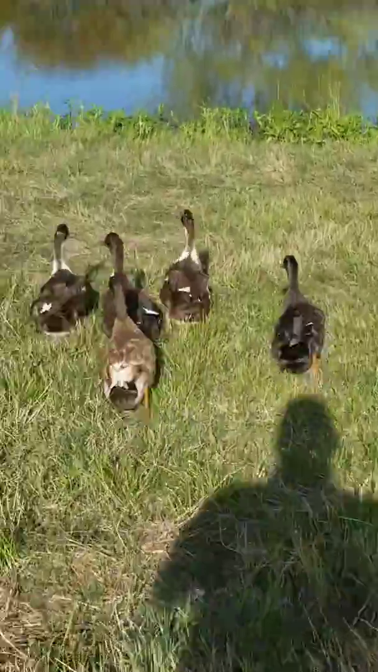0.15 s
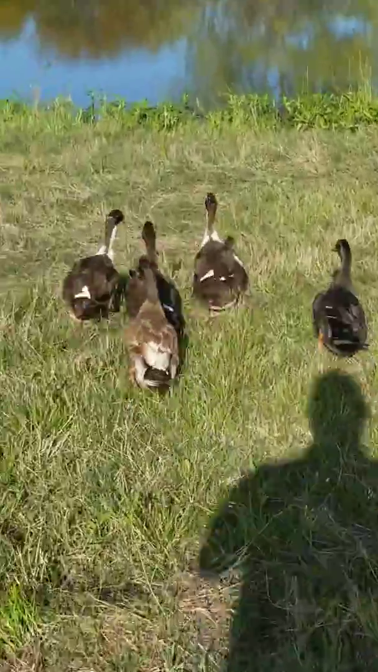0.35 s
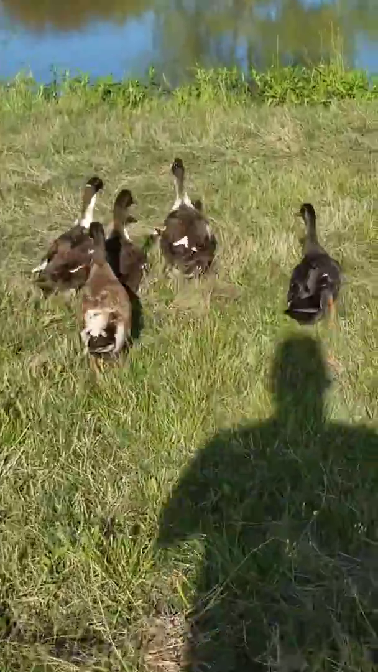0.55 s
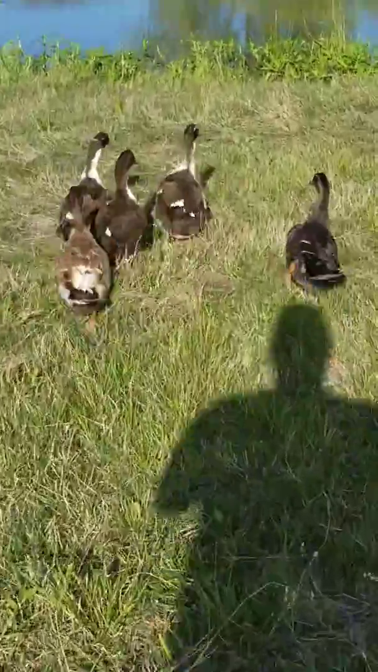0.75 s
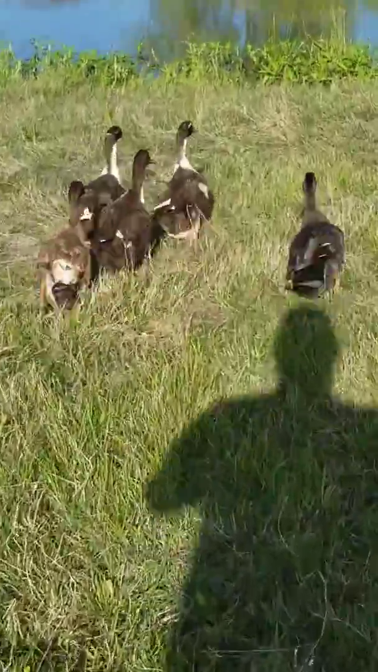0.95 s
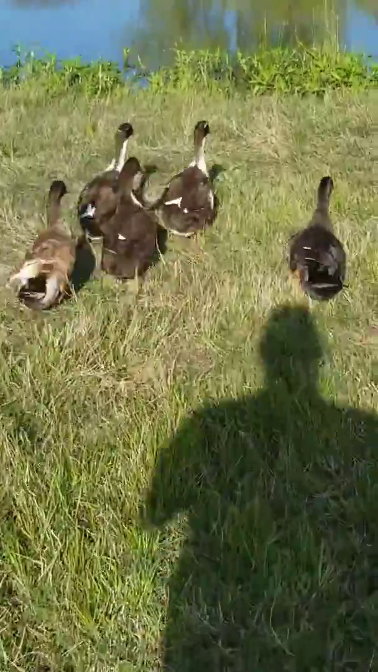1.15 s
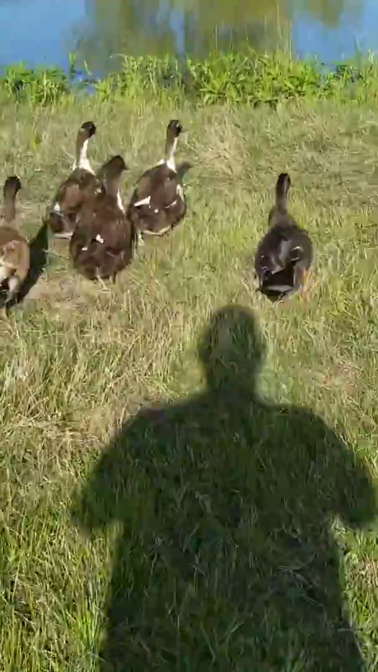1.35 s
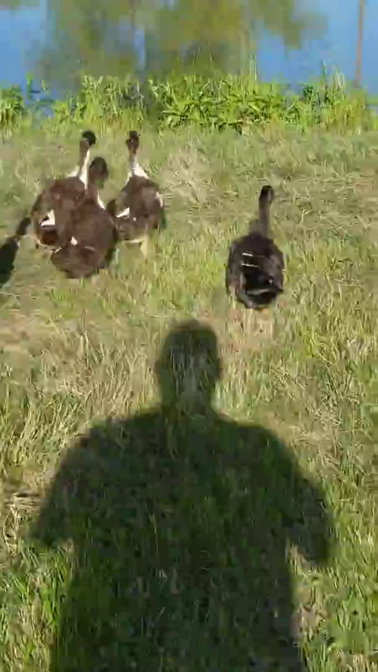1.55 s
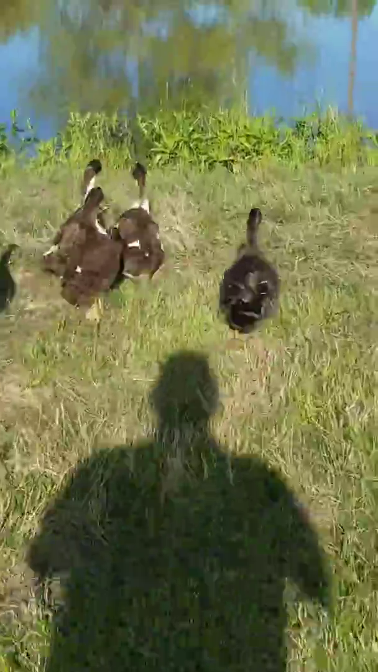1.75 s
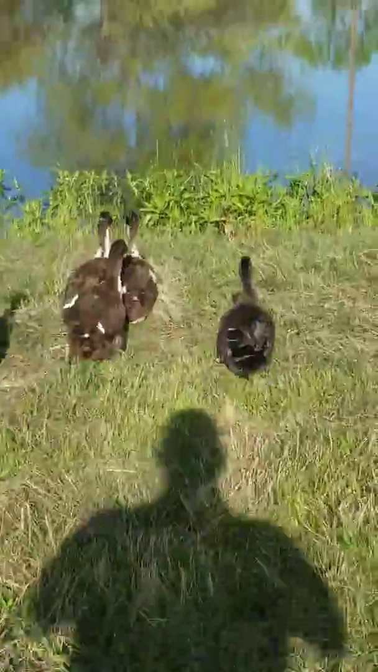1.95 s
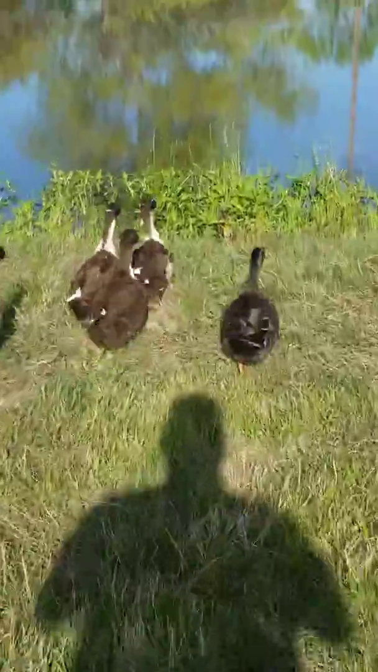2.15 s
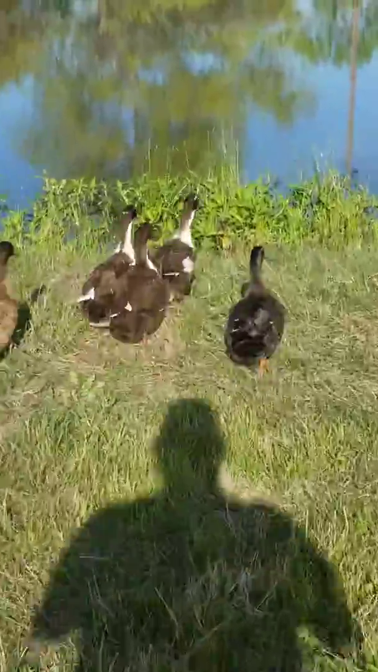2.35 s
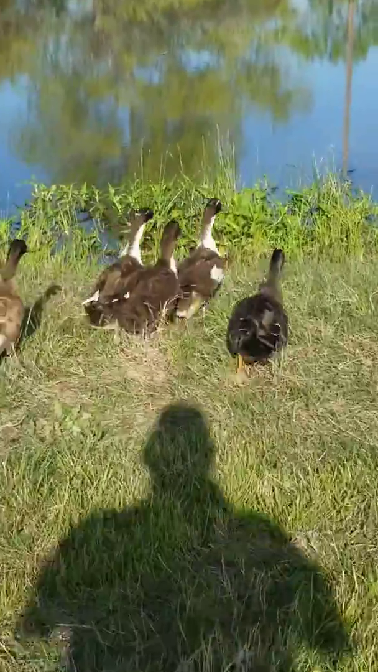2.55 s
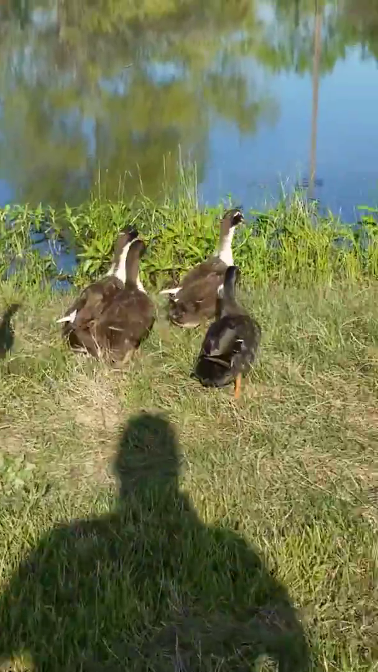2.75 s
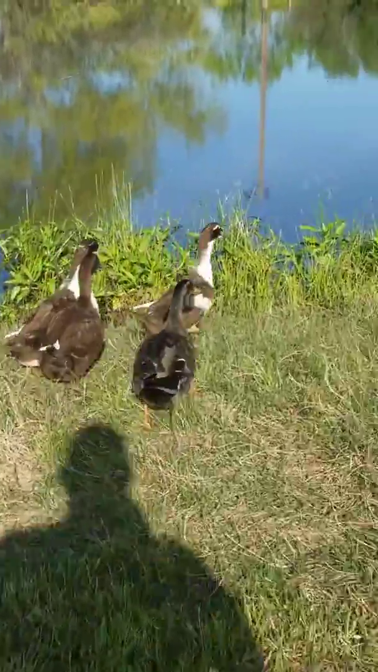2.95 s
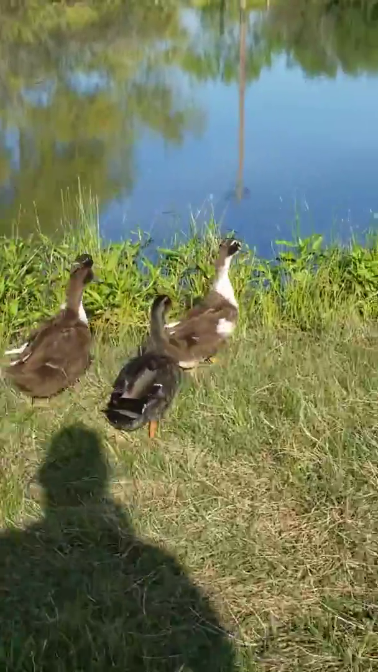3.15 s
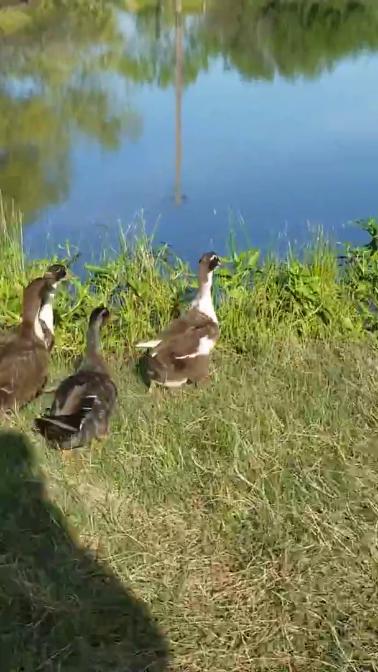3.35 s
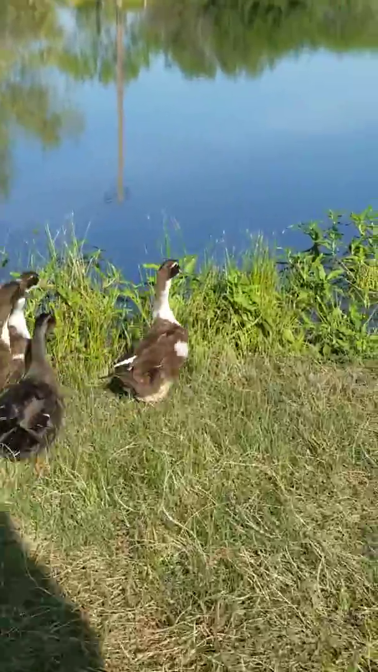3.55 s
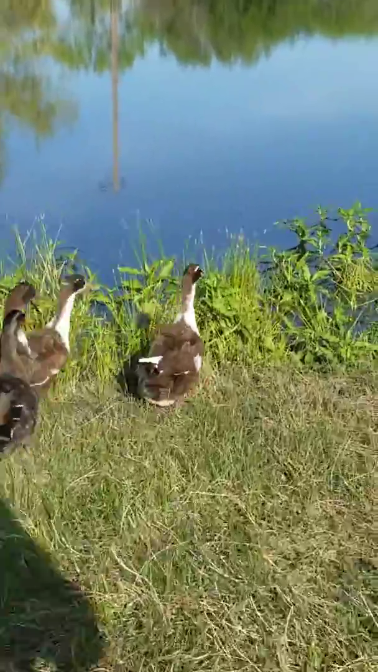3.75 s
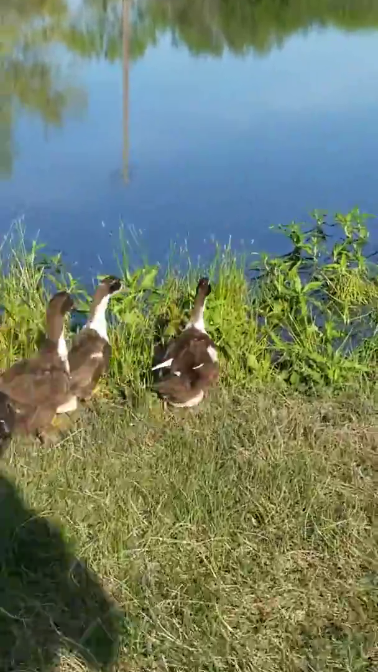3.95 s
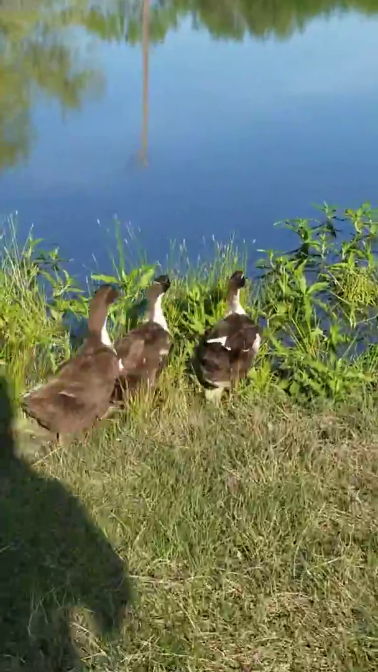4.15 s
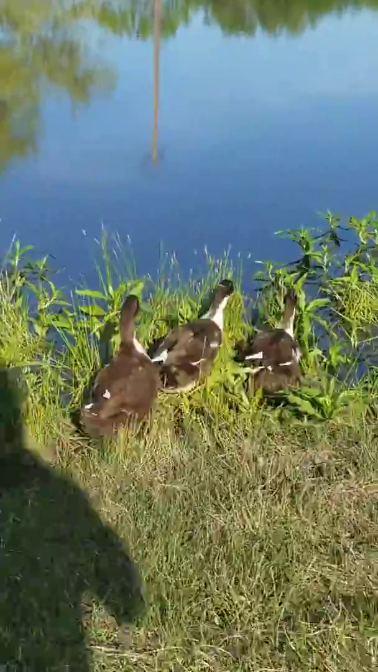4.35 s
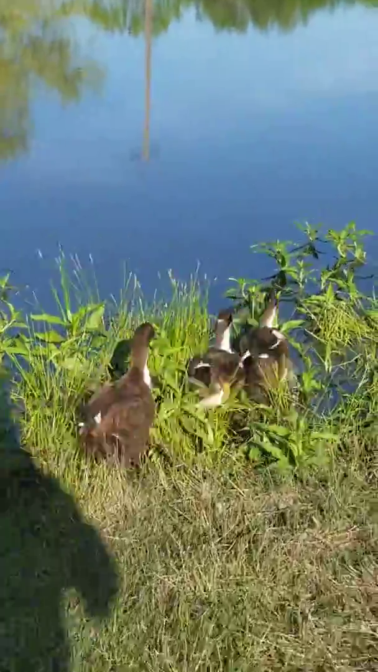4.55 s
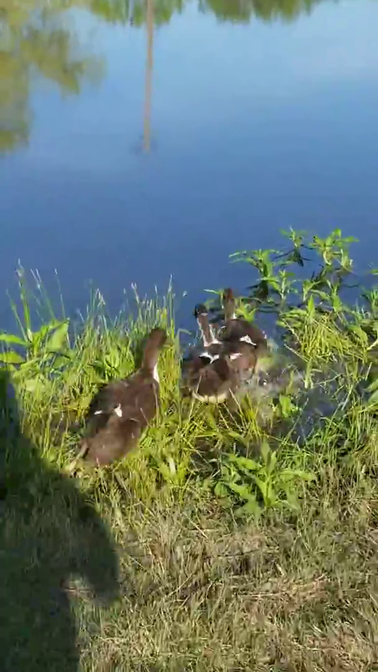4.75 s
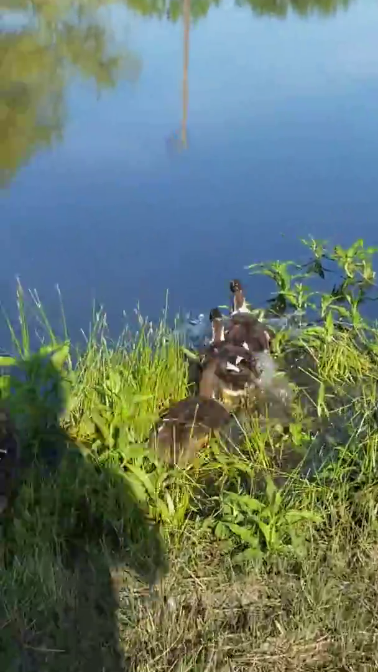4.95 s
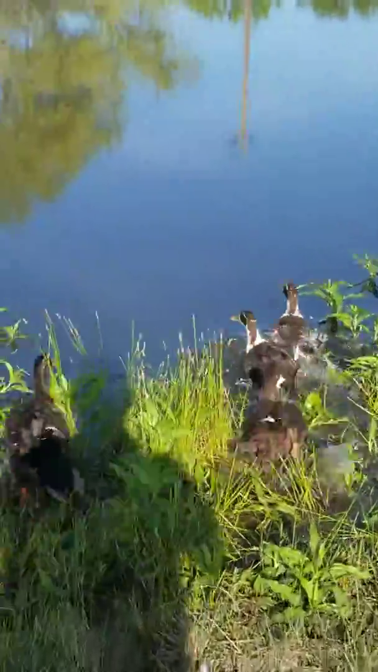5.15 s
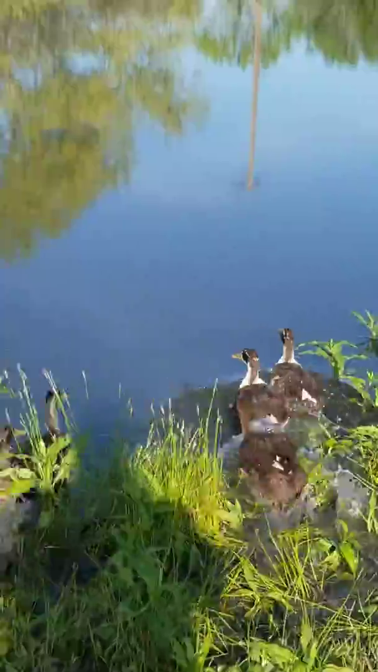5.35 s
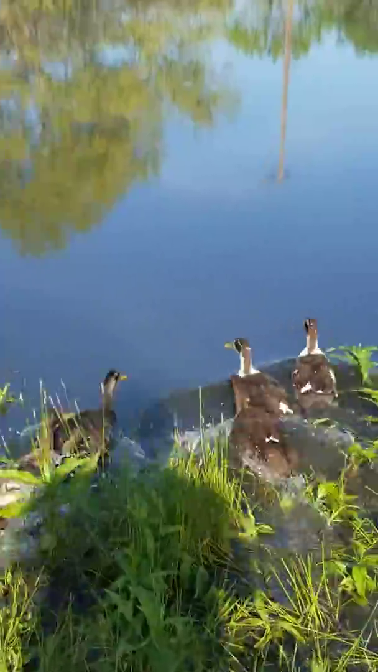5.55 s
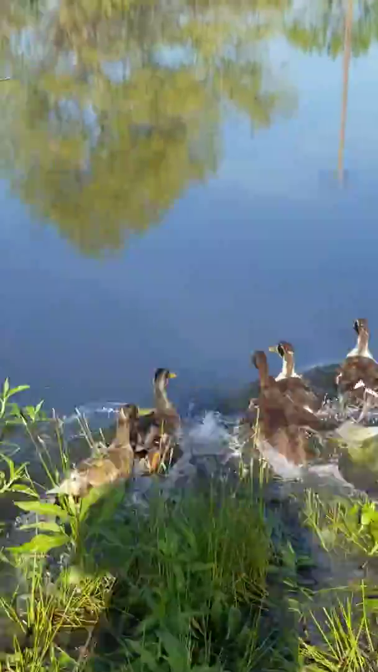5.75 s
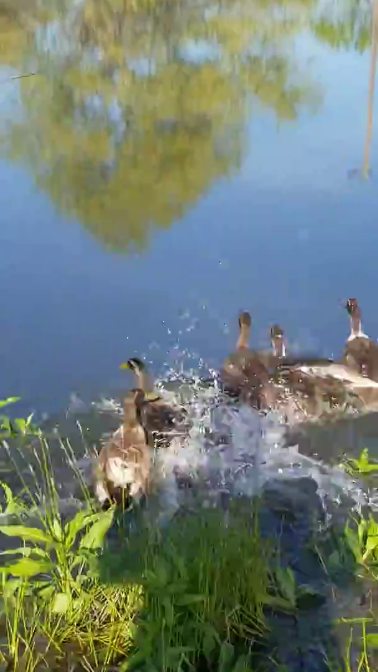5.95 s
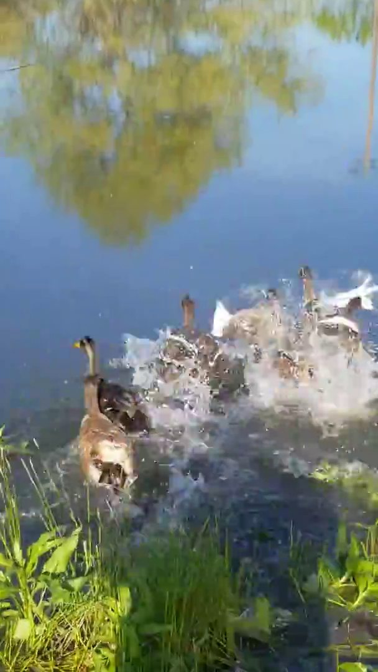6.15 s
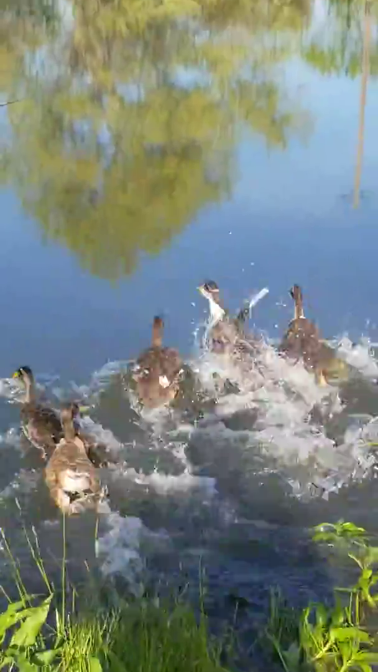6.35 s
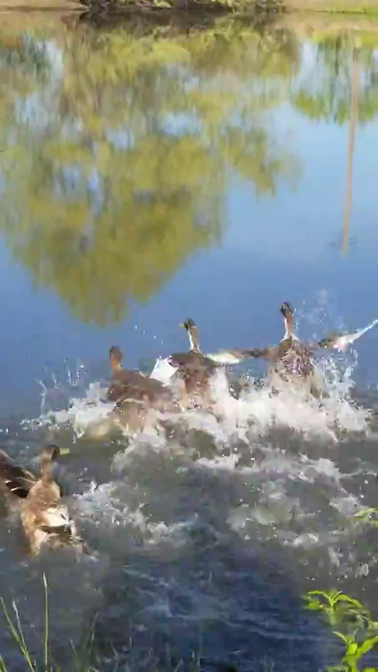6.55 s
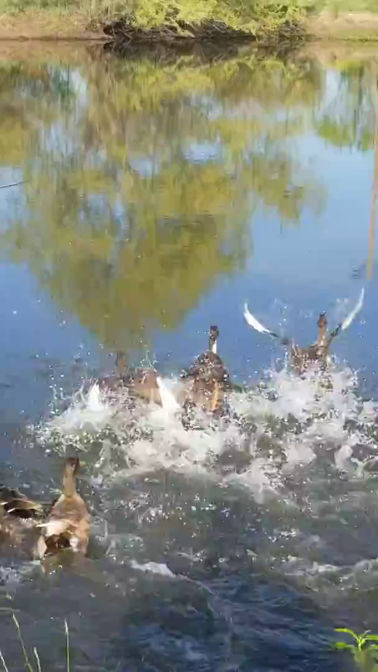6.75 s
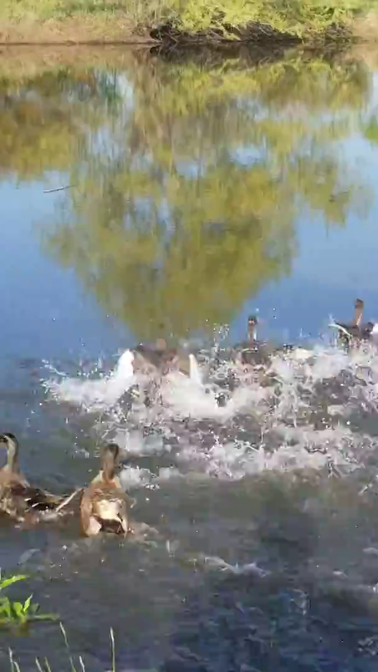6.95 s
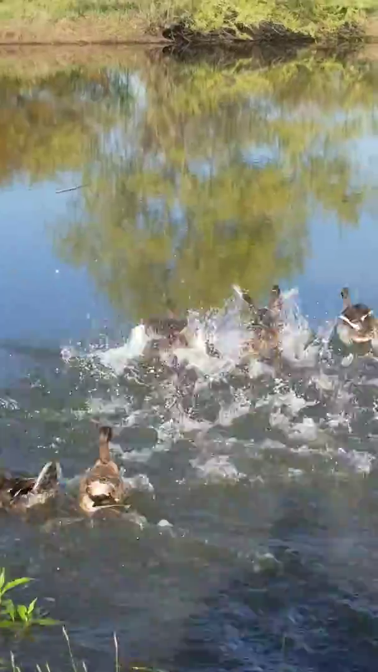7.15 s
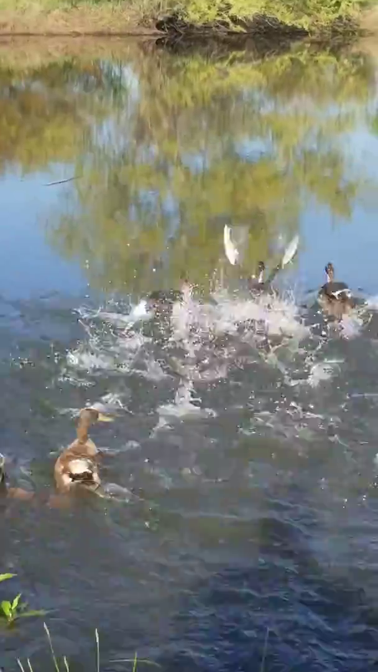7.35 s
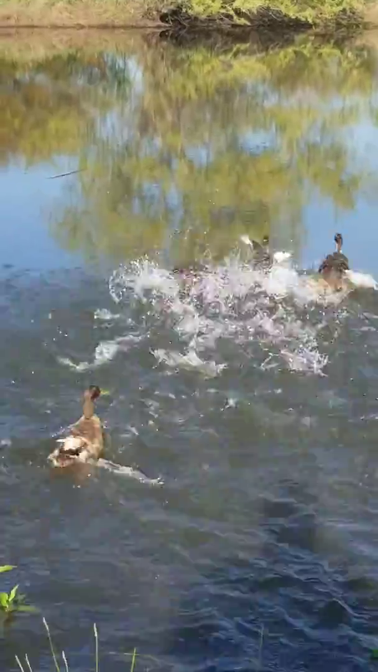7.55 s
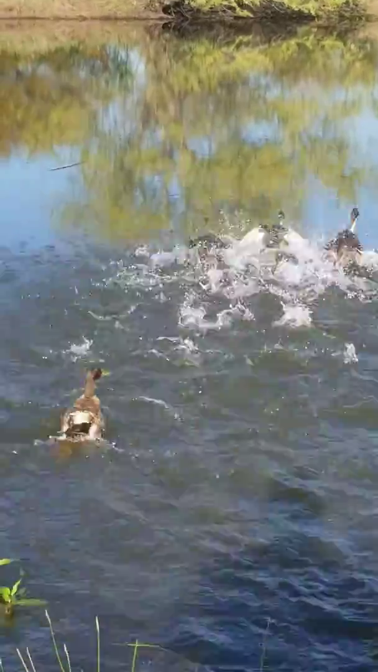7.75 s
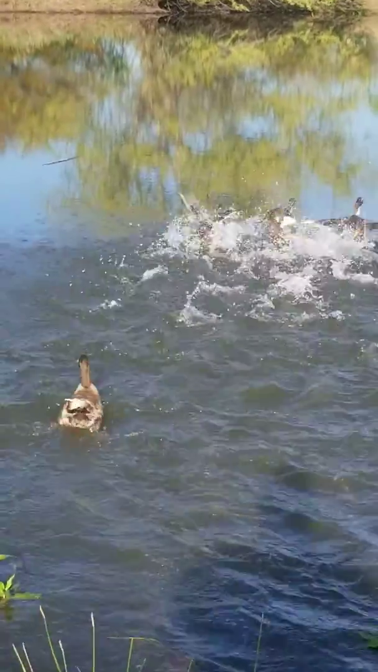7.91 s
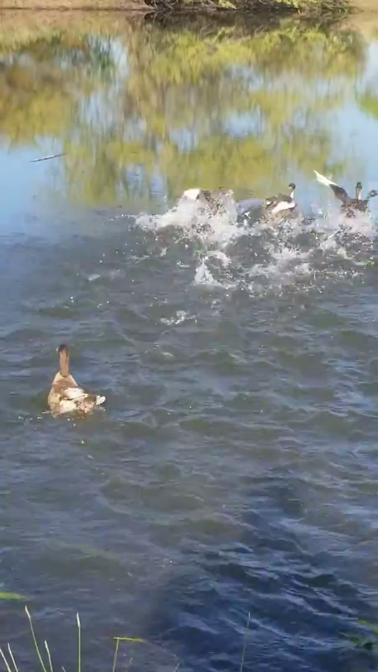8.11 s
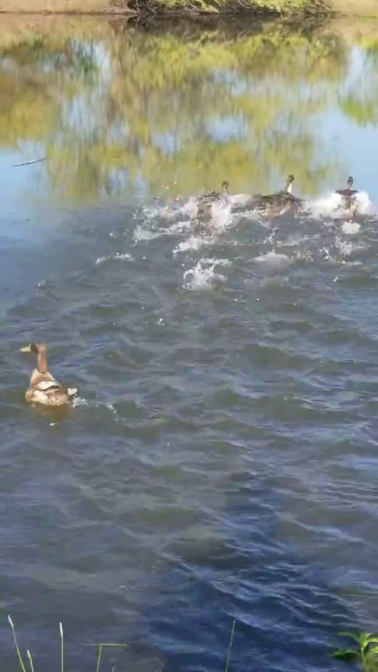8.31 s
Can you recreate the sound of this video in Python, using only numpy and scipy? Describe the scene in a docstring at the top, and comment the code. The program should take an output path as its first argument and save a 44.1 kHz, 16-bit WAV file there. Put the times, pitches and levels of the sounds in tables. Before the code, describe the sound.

Close swishing footsteps and short duck calls on a grassy bank give way to loud, frantic splashing as the ducks rush into the water.

```python
"""Ducks herded into a pond

A walker herds ducks through dry grass: shoes swish and crunch right below the two microphones, made of
random clicks, while stalks knock and blades crack. Drakes rasp and ducks quack ahead, as pulses ringing
throat and bill. Then the flock runs into the water with wing slaps, spray and ringing bubbles.
Low puffs of noise rumble: wind or handling at first, later low thumps along with the slaps."""
import sys
import numpy as np
from scipy import signal
from scipy.fft import rfft, irfft, next_fast_len
from scipy.io import wavfile

SR = 44100
rng = np.random.default_rng(int(sys.argv[2]) if len(sys.argv) > 2 else 0)


def unload_audio(sound):
    """Save the sound as a 16-bit wav file, at the path given as the first command line argument."""
    columns = np.transpose(np.atleast_2d(sound))
    # keep every value between -1 and 1, then stretch to whole-number steps
    steps = np.round(np.clip(columns, -1, 1) * 32767)
    wavfile.write(sys.argv[1], SR, steps.astype(np.int16))


N = 369548   # samples in the scene
SIZE = next_fast_len(N + 4096)   # transform length, with room for filter tails
HZ = np.maximum(np.arange(SIZE // 2 + 1) * SR / SIZE, 1)   # frequency of every bin

# All levels are relative: the mixes below add their own trims.
# Quiet open air, spectrum: (f/Hz, level/dB)
AIR = [(59, -38), (100, -39), (372, 18), (1240, -45.5), (1640, 4), (2560, -28), (2840, -40), (3090, -24),
       (3660, -12), (15800, -4.5)]
AIR_DB = -56

# Low puffs of rumble, wind or handling at first, later low thumps along with the slaps:
# (middle t/s, length/s, level/dB)
PUFFS = [(0.02, 0.021, -52), (0.34, 0.025, -54), (0.73, .02, -62), (0.9, .04, -69), (1.03, .02, -73),
         (1.28, 0.03, -73), (1.51, .02, -60), (1.75, .02, -75), (2.12, 0.094, -67), (2.54, 0.026, -59),
         (2.85, 0.43, -56.5), (3.28, 0.089, -60), (3.82, 0.31, -66), (4.06, 0.025, -59), (4.25, .04, -58.5),
         (4.5, .04, -74), (5.34, .02, -72), (5.74, .02, -60), (5.98, 0.049, -60), (6.21, .04, -63),
         (6.36, .02, -58), (6.6, 0.26, -60), (6.85, 0.056, -65), (7.09, 0.024, -65), (7.28, 0.054, -69),
         (7.48, 0.082, -60.5), (7.72, 0.046, -61), (7.97, 0.018, -66), (8.07, .04, -66), (8.37, .02, -65)]
PUFF_RISE_DB_PER_S, PUFF_FALL_DB_PER_S, PUFF_REST_DB = 236, 211, -82

# A shoe sweeps through the blades: (middle t/s, length/s, level/dB)
SWEEPS = [(0.02, 0.012, -53), (0.18, 0.027, -62), (0.33, 0.048, -43), (0.49, 0.016, -52),
          (0.63, 0.024, -65), (0.85, 0.18, -53.5), (1.22, 0.059, -55), (1.36, 0.043, -56),
          (1.65, 0.09, -52.5), (1.88, 0.06, -56.5), (2.26, 0.13, -52), (2.39, 0.043, -53),
          (2.82, 0.029, -53), (2.96, 0.027, -56), (3.11, 0.029, -61), (3.26, 0.033, -48),
          (3.38, 0.039, -50.5), (3.75, 0.27, -50), (3.97, .03, -60.5), (4.16, 0.13, -45.5),
          (4.36, 0.05, -50), (4.44, 0.046, -51), (4.64, 0.13, -46.5), (4.79, 0.037, -47),
          (4.835, 0.012, -42.5), (4.92, 0.026, -53), (5.0, 0.047, -55), (5.14, 0.17, -46),
          (5.36, 0.12, -53.5), (5.58, 0.022, -56), (5.76, 0.18, -52.5)]
SWEEP_RISE_DB_PER_S, SWEEP_FALL_DB_PER_S = 258, 193
# A sole presses the grass down: (middle t/s, length/s, level/dB)
TREADS = [(0.02, 0.012, -43), (0.335, 0.026, -38.5), (0.49, 0.015, -44.5), (0.61, .02, -58.5),
          (0.89, 0.15, -45), (1.365, 0.027, -43), (1.6, 0.018, -78), (1.72, 0.024, -60),
          (1.87, 0.0092, -54.5), (2.17, 0.12, -44), (2.41, 0.078, -43), (2.82, 0.0078, -37.5),
          (2.94, 0.049, -44), (3.32, 0.03, -46), (3.41, .01, -51), (3.67, 0.026, -48),
          (3.775, 0.043, -42.5), (3.84, .01, -52), (3.94, .02, -47), (4.04, 0.018, -48.5),
          (4.2, 0.011, -42.5), (4.235, 0.0092, -41.5), (4.5, 0.022, -43.5), (4.6, 0.019, -50),
          (4.665, 0.0093, -37.5), (4.75, 0.027, -42), (4.802, 0.011, -45), (4.905, 0.0091, -40),
          (4.945, .01, -58), (5.08, 0.0076, -39.5), (5.16, 0.037, -40.5), (5.36, .02, -42),
          (5.58, 0.0088, -42.5), (5.66, .01, -43), (5.73, 0.0073, -36)]
TREAD_RISE_DB_PER_S, TREAD_FALL_DB_PER_S = 346, 245
# Blades settle between steps: (t/s, swish level/dB, crunch level/dB)
GRASS_REST = [(0, -57.5, -53.5), (3, -60, -57.5), (5.8, -108, -64), (6.0, -66, -45)]
# Spectrum of brushed blades: (f/Hz, level/dB)
SWISH = [(300, -43), (1000, 16.5), (2500, 3), (3100, -1), (4000, 11), (4900, 3.5), (6500, 3.5),
         (8600, -3.5), (11000, 3), (15000, 8.5)]
# Spectrum of pressed grass: (f/Hz, level/dB)
CRUNCH = [(120, -30.5), (250, -8.5), (500, 11.5), (1000, -1), (2000, -1), (4000, -11), (9000, -41)]
# Short pitched knocks: under a shoe, a stalk; ahead, a duck's foot, bill or call pulse:
# (t/s, peak level/dB, pitch f/Hz, 1 ahead or 0 under a shoe)
KNOCKS = [(0.03, -32, 1200, 0), (0.284, -30, 1490, 0), (0.323, -21, 1500, 0), (0.381, -30, 1700, 0),
          (0.454, -21.5, 1290, 0), (0.7822, -32, 1230.0, 0), (0.864, -32, 670, 0), (0.88, -24, 643, 0),
          (0.9287, -14.5, 1320, 0), (0.9436, -18, 980.0, 0), (0.9675, -27, 1130.0, 0),
          (1.18, -37, 1600.0, 0), (1.344, -32, 1530.0, 0), (1.368, -26, 1090.0, 0), (1.3826, -28, 900, 0),
          (1.397, -29, 1300, 0), (1.586, -41, 1550.0, 1), (1.6016, -29, 1590.0, 0),
          (1.6335, -31, 1750.0, 0), (1.685, -27, 1260.0, 0), (1.701, -21.5, 1620, 0),
          (1.924, -34, 1030.0, 1), (1.936, -32, 950, 1), (2.095, -33, 1500, 1), (2.1895, -28, 1650.0, 1),
          (2.2208, -23.5, 1230.0, 0), (2.274, -29, 1530.0, 0), (2.695, -35, 1400.0, 1),
          (2.7373, -41, 1480.0, 1), (2.798, -36, 610.0, 0), (2.8233, -19.5, 710.0, 0),
          (2.8947, -27, 590.0, 0), (2.9504, -24, 1760, 1), (3.107, -40, 1380.0, 1), (3.197, -46, 1600.0, 1),
          (3.3247, -25.5, 620.0, 0), (3.634, -39, 1580.0, 1), (3.8364, -19.5, 1050, 0),
          (3.8916, -36, 2120.0, 1), (3.9017, -37, 1420.0, 1), (4.1123, -29, 1290, 1),
          (4.1915, -29, 1970, 1), (4.1994, -26, 1940, 1), (4.2834, -25, 1700, 1), (4.4743, -15.5, 1960, 1),
          (4.6121, -25, 1690.0, 1), (4.66, -21, 1240, 1), (4.7627, -43, 1300.0, 1),
          (4.9705, -35, 1660.0, 1), (5.016, -25.5, 2070.0, 1), (5.069, -16, 1430, 1),
          (5.0933, -28, 1840.0, 1), (5.1465, -25, 1400.0, 1), (5.2023, -34, 540.0, 0),
          (5.296, -35, 1700.0, 1), (5.3326, -26, 1710.0, 1)]
# Thin blades crack: (t/s, peak level/dB, pitch f/Hz)
CRACKS = [(0.0273, -32, 4230), (0.17, -46, 3910), (0.2409, -32.5, 5410), (0.2505, -27, 3660),
          (0.4184, -36, 14300), (0.4409, -28, 14900), (0.4858, -32, 13300), (0.625, -39, 13500),
          (0.9267, -25, 3570), (1.1393, -34, 3880), (1.3648, -32, 4080), (1.4163, -32, 4050),
          (1.5224, -48, 4070), (1.5713, -50, 3590), (1.593, -34, 3590), (1.632, -29, 3520),
          (1.8452, -46, 13800), (2.2195, -25, 3660), (2.3905, -40, 3690), (2.6653, -44, 13200),
          (2.6733, -41, 14900), (2.6963, -55, 3890), (2.7396, -32, 3520), (2.8998, -41, 3760),
          (3.0435, -51, 3540), (3.2151, -37, 13300), (3.5483, -47, 14800), (3.5758, -36, 3820),
          (3.9187, -34.5, 3920), (4.0038, -41, 13500), (4.188, -32, 11800), (4.337, -23.5, 4240),
          (4.3856, -29, 7420), (4.411, -31, 4120), (4.4722, -46, 4690), (4.5346, -32, 3950),
          (4.5805, -41, 13600), (4.5994, -43, 5260), (4.6586, -22, 4210), (4.798, -29, 14400),
          (4.8357, -27, 14200), (4.8344, -19, 13400), (4.9122, -34, 5140), (4.9901, -29, 4300),
          (5.0514, -44, 4110), (5.0679, -24.5, 4100), (5.1442, -26, 13700), (5.3353, -30, 4040),
          (5.5263, -36, 4170), (5.6002, -40, 4470)]

# Webbed feet shuffle in the grass: (middle t/s, length/s, level/dB)
PATTER = [(.03, 0.063, -56), (.2, 0.067, -53), (.33, 0.075, -49), (.47, 0.081, -55), (.61, 0.13, -55),
          (.78, 0.11, -54), (.9, 0.1, -52), (1.12, 0.065, -55.5), (1.185, .02, -53), (1.28, 0.061, -46.5),
          (1.35, 0.025, -49), (1.44, 0.051, -48), (1.6, 0.039, -46), (1.65, 0.035, -56),
          (1.74, 0.059, -49.5), (1.82, 0.017, -65), (1.9, 0.098, -50), (2.06, 0.016, -63),
          (2.14, 0.13, -46.5), (2.241, .006, -42), (2.258, .008, -43.5), (2.278, .012, -40.5),
          (2.37, 0.08, -48.5), (2.45, 0.022, -49), (2.71, 0.026, -49), (2.8, 0.052, -47.5),
          (2.93, 0.079, -46.5), (3.12, 0.094, -48.5), (3.205, 0.025, -46.5), (3.28, 0.037, -45.5),
          (3.385, 0.011, -47.5), (3.415, 0.017, -46.5), (3.61, .01, -53.5), (3.632, .02, -46),
          (3.68, 0.062, -47), (3.72, .015, -47), (3.77, 0.058, -50), (3.94, 0.093, -52.5),
          (4.05, 0.049, -49.5), (4.13, 0.038, -52), (4.22, 0.045, -60), (4.4, .15, -44.5),
          (4.58, 0.098, -52), (4.72, 0.022, -49), (4.8, 0.045, -51), (4.96, 0.11, -49), (5.12, 0.088, -48),
          (5.22, 0.037, -42.5), (5.32, .1, -46)]
PATTER_RISE_DB_PER_S, PATTER_FALL_DB_PER_S, PATTER_REST_DB = 900, 600, -66
# Spectrum of the flock's rustle: (f/Hz, level/dB)
FEET = [(250, -21), (500, 1.5), (900, -24.5), (1400, 5.5), (1620, 7), (1850, -6), (2300, 1.5), (3200, -1.5),
        (6000, -53.5)]
# a narrow band, likely a microphone resonance, colours that rustle
BAND_HZ, BAND_WIDTH_HZ, BAND_DB = 1590, 240, 0
# Short calls: (t/s, length/s, level/dB, pulse rate f/Hz, throat f/Hz, roughness, held to 0-1)
CALLS_MADE = [(0.698, 0.099, -46.5, 90, 2260, 0.7), (0.923, 0.024, -46, 84.7, 2090, 0.1),
              (1.102, 0.042, -52, 95, 2000, 0.46), (1.225, 0.052, -42.5, 92, 2270, 0.2),
              (1.253, 0.06, -42.5, 87.6, 1960, 0.15), (1.465, 0.06, -40.5, 91.1, 1930, 0.2),
              (1.576, 0.041, -45, 83.5, 1830, 0.5), (1.629, 0.097, -44, 87.3, 1600, 0.8),
              (1.862, 0.086, -49, 94.3, 2020, 0.42), (2.074, 0.07, -47, 88, 1890, 0.23),
              (2.309, 0.058, -41.5, 87.5, 2020, 0.28), (2.424, 0.056, -63, 88.6, 1850, 0.1),
              (2.685, 0.098, -45.5, 88.6, 1720, 0.32), (2.921, 0.079, -48, 91, 1680, 1.07),
              (3.079, 0.078, -54, 92, 2080, 0.4), (3.662, 0.015, -48, 91.6, 2130, 0.1),
              (3.866, 0.075, -46.5, 85, 1350, 0.26), (3.879, 0.056, -44, 79.6, 2120, 0.26),
              (4.015, 0.042, -40, 189.3, 1340, 0.32), (4.181, 0.029, -39, 152.6, 1800, 0.28),
              (4.343, 0.23, -49.5, 61.7, 1620, 0.43), (4.618, 0.035, -41, 200.3, 1910, 0.6),
              (4.644, 0.042, -36, 226, 1500, 0.35), (4.776, 0.02, -44, 234, 1220, 0.5),
              (4.821, 0.013, -36, 295, 2090, 0.1), (4.844, 0.018, -29.5, 226.6, 1360, 0.24),
              (4.895, 0.014, -50, 150, 1910, 0.03), (4.911, 0.017, -35.5, 221, 1440, 0.3),
              (4.946, 0.0057, -39.5, 268, 2410, 0.4), (5.069, 0.045, -39, 222, 1650, 0.7),
              (5.132, 0.029, -42, 221, 1500, 0.52), (5.257, 0.13, -42.5, 57.7, 1750, 0.29),
              (5.643, 0.031, -41.5, 149.8, 1380, 0.37), (5.973, 0.029, -34.5, 145, 1600, 0.1)]

# Churned water: (t/s, bubbles level/dB, spray level/dB, surge level/dB)
CHURN = [(4.5, -68, -57, -87), (4.75, -64, -52, -67), (4.85, -39, -47, -72), (4.88, -62, -67, -74),
         (4.91, -52, -47.5, -64), (5.0, -48, -52.5, -72), (5.14, -49, -47, -95), (5.37, -46, -52, -64),
         (5.68, -45.5, -47, -93), (5.82, -42, -48.5, -70), (6.0, -40.5, -42.5, -48), (6.1, -37, -43, -57),
         (6.2, -38.5, -42.5, -43), (6.31, -42.5, -43, -51.5), (6.49, -39.5, -41, -50.5),
         (6.74, -36.5, -41.5, -41.5), (6.85, -38.5, -42.5, -51), (7.0, -39, -43.5, -55.5),
         (7.07, -35, -42, -48), (7.14, -43, -45, -58), (7.27, -38, -44.5, -50.5), (7.35, -41, -47, -60),
         (7.44, -43.5, -45, -50), (7.53, -41.5, -47, -52), (7.6, -38.5, -46, -62), (7.72, -42.5, -49, -48),
         (7.84, -40, -48, -65), (8.06, -43.5, -48.5, -60), (8.38, -46, -52, -56)]
# Spectrum of falling spray: (f/Hz, level/dB)
SPRAY = [(500, -12), (1500, 12), (2500, 7.5), (3300, -1), (3900, 3), (5100, 0), (5800, -6), (7200, -4.5),
         (9000, -18), (12000, -6), (15500, -10)]
# The finest spray, heard only in the top octave: (t/s, level/dB)
MIST = [(5.2, -70), (5.4, -56), (5.9, -54), (6.3, -52), (6.8, -52), (7.05, -66), (7.3, -72)]
MIST_HZ = 10500
# Gulping bubbles, and low plunging thumps at the lowest pitches:
# (t/s, level/dB, starting pitch f/Hz, ring/s)
GULPS_AND_PLUNGES = [(5.35, -27.5, 600, 0.012), (5.384, -34.5, 199, 0.0096), (5.414, -28, 490, 0.01),
                     (5.466, -28, 530, 0.0074), (5.573, -36.5, 510, 0.014), (5.654, -20, 550, 0.005),
                     (5.987, -32, 153, 0.0043), (6.062, -24, 974, 0.0053), (6.17, -30, 497, 0.0049),
                     (6.18, -26, 204, 0.0061), (6.199, -36, 446, 0.011), (6.251, -31, 1020, 0.0037),
                     (6.268, -25.5, 530, 0.01), (6.405, -27, 570, 0.0099), (6.476, -30, 158, .01),
                     (6.479, -23, 533, 0.013), (6.51, -23, 866, 0.0094), (6.547, -27, 556, 0.0093),
                     (6.55, -34, 223, 0.009), (6.625, -22, 227, 0.012), (6.699, -22, 508, 0.015),
                     (7.058, -26, 634, 0.006), (7.074, -20, 545, 0.0075), (7.156, -25, 670, 0.004),
                     (7.277, -21, 507, 0.004), (7.314, -33, 533, 0.019), (7.404, -34, 1160, 0.005),
                     (7.458, -32, 540, 0.0079), (7.497, -44, 198, 0.0061), (7.502, -28, 590, 0.0055),
                     (7.564, -27, 1045, 0.0035), (7.529, -37, 578, 0.01), (7.628, -24, 553, .006),
                     (7.749, -34, 676, 0.0082), (7.783, -37, 680, 0.007), (7.875, -35.5, 188, .01),
                     (8.015, -35, 170, 0.011), (7.925, -41, 616, 0.006), (8.13, -42, 290, 0.016),
                     (8.159, -30, 816, 0.0072), (8.308, -32, 1100, .004)]
# Wings and feet slap the surface: (t/s, level/dB, thump level/dB and spray level/dB relative to it, burst/s)
SLAPS = [(5.662, -40, -41, -43, 0.0035), (5.735, -11.5, -35, -43, 0.0037), (5.841, -26.5, -46, -41, 0.0028),
         (5.887, -26.5, -33, -56, 0.001), (5.932, -24.5, -18, -44, 0.015), (5.995, -46, -20, 0, 0.004),
         (6.196, -31, -3, -10, 0.0058), (6.334, -17, -24, -47, 0.0016), (6.596, -20, -9, -14, 0.002),
         (6.61, -15, -14, -9.5, 0.0059), (6.677, -24.5, -6, -20.5, 0.1), (6.824, -16, -15, -21, 0.005),
         (6.837, -14.5, -16, -13.5, 0.0068), (6.877, -19, -13, -12, 0.0047), (6.972, -40, -20, 8, 0.0045),
         (7.078, -22.5, -4.5, -14.5, 0.01), (7.238, -16, -13.5, -44, 0.0012),
         (7.297, -18.5, -10.5, -18, 0.008), (7.431, -16, -13, -40, 0.0039), (7.665, -21, -35, -44, 0.0019),
         (7.738, -23.5, -15, -13, 0.01), (7.744, -23.5, -8.5, -22, 0.0091),
         (7.963, -18.5, -12, -8.5, 0.0057), (8.012, -42, -24, 4, 0.0088), (7.935, -42, -20, -18, 0.0037),
         (8.238, -24.5, -15, -32, 0.0053), (8.355, -29, -16, -25, 0.0091)]
WASH_S, WASH_DB = 0.0079, -5   # the noisy tail of a slap
# A slap that throws more spray traps less air.
POCKET_DB, POCKET_LOSS_PER_SPRAY_DB, POCKET_DELAY_S = 1, .17, .0018

# The long quack on the water: (t/s, level/dB, bill f/Hz)
QUACK = [(6.6735, -29, 1690), (6.695, -32, 1800), (6.722, -32, 1650), (6.732, -30.5, 1580),
         (6.76, -32.5, 1870), (6.772, -38, 1650), (6.788, -42, 1500), (6.808, -29.5, 1650),
         (6.82, -37, 1900)]
# Its pulses, at first one strong in four: (t/s, pulse rate f/Hz, level/dB of the other three)
QUACK_PULSES = [(6.6735, 209.8, -8), (6.729, 209.8, -8), (6.733, 206, -1.5), (6.77, 227, -1),
                (6.79, 224, -2), (6.803, 211, -1), (6.82, 214, -1)]
THROAT_HZ, THROAT_RING_S, THROAT_DB, BILL_RING_S, QUACK_JITTER = 1350, .004, -2, .0005, .012

# Where sounds from ahead arrive: (f/Hz, left phase lead/rad, left minus right level/dB)
POND_SIDE = [(96, 0.5, -1.5), (443, 0, 3), (1500, 0.77, -0.5), (2000, 0.5, -7), (3760, 4.5, 3.5),
             (4230, 5, -9.5), (7340, 10.5, 9), (11800, 10, -13.5), (16800, 43, 22)]
BANK_LEAD_S, FEET_LEAD_S = .000175, -.000522   # left leads by this much; below zero, right leads
CUTOFF_HZ = 15750


def from_db(db):
    """Turns decibels into gain."""
    return 10 ** (np.asarray(db) / 20)


def rms_one(x):
    """Scales a sound to an average strength (rms) of 1."""
    return x / np.sqrt(np.mean(x ** 2) + 1e-20)


def in_time(rows):
    """Turns level columns into gains for every sample, at -120 dB outside the table."""
    s, *columns = np.transpose(rows)
    t = np.arange(N) / SR
    return [from_db(np.interp(t, s, c, left=-120, right=-120)) for c in columns]


def swells(rows, rise_db_per_s, fall_db_per_s):
    """Gain of events that rise, hold and fall; their powers add."""
    t = np.arange(0, N, 64) / SR
    s, length, db = np.transpose(rows)[..., None]
    early = np.maximum(s - length / 2 - t, 0)
    late = np.maximum(t - s - length / 2, 0)
    power = from_db(db - rise_db_per_s * early - fall_db_per_s * late) ** 2
    return np.interp(np.arange(N) / SR, t, np.sqrt(power.sum(axis=0)))


def drift(rate):
    """Slow random wandering with rms 1; a higher rate in Hz wanders faster."""
    r = np.exp(-80 * np.pi * rate / SR)   # one step spans 40 samples
    noise = rng.standard_normal(N // 40 + 2002)
    slow = signal.lfilter([1], [1, -2 * r, r * r], noise)[2000:]   # skip the start-up
    return np.interp(np.arange(N) / 40, np.arange(len(slow)), rms_one(slow))


def grains(per_s, spread_db, clump_db):
    """Random clicks of uneven size that come in clumps."""
    sizes = from_db(spread_db * np.minimum(rng.exponential(1, N), 5)) * rng.choice([-1, 1], N)
    happens = rng.random(N) < per_s / SR
    return sizes * happens * from_db(clump_db * drift(21.8))


def at_hz(points, column=1):
    """Reads a table at every bin, along log frequency."""
    points = np.array(points, float)
    return np.interp(np.log(HZ), np.log(points[:, 0]), points[:, column])


def response(spectrum):
    """Minimum-phase filter (folded cepstrum), so that nothing sounds before a click."""
    cepstrum = irfft(np.log(from_db(at_hz(spectrum))), SIZE)
    cepstrum[1:SIZE // 2] *= 2
    cepstrum[SIZE // 2 + 1:] = 0
    return np.exp(rfft(cepstrum))


def coloured(x, spectrum):
    """Shapes a sound with a spectrum table."""
    return irfft(rfft(x, SIZE) * response(spectrum), SIZE)[..., :N]


def resonance(x, hz, width):
    """Rings around one pitch: a two-pole band with gain 1 on top, width in Hz."""
    r = np.exp(-np.pi * width / SR)
    edge = (1 - r * r) / 2
    return signal.lfilter([edge, 0, -edge], [1, -2 * r * np.cos(2 * np.pi * hz / SR), r * r], x)


def at_ports(x, lead, pan_db):
    """One source reaches two microphones with a phase lead and a level tilt per frequency."""
    half = from_db(pan_db / 2) * np.exp(.5j * lead)
    return irfft(rfft(x, SIZE) * np.array([half, 1 / half]), SIZE)[:, :N]


def wide(make, spectrum, low_share, high_share):
    """A spread-out source: one part common to both ports, one of each port's own, shared out by pitch."""
    share = np.clip(at_hz([(1000, low_share), (12000, high_share)]), 0, 1)
    parts = rfft(np.array([make(), make(), make()]), SIZE) * response(spectrum)
    # bring each part to rms 1
    parts *= np.sqrt(N / 2) / np.sqrt(np.mean(np.abs(parts) ** 2, axis=1, keepdims=True) / 2)
    common = irfft(np.sqrt(1 - share) * parts[0], SIZE)[:N]
    own = irfft(np.sqrt(share) * parts[1:], SIZE)[:, :N]
    return common, own


def add(out, s, piece):
    """Mixes a short sound in at a time."""
    at = round(s * SR)
    out[at:at + len(piece)] += piece[:N - at]


def open_air():
    """Quiet shaped noise, different at each port, whose level wanders slowly."""
    noise = coloured(rng.standard_normal((2, N)), AIR)
    return from_db(AIR_DB) * rms_one(noise) * from_db(2.7 * drift(5))


def band_noise(x, band):
    """Keeps one frequency band of a noise, at rms 1."""
    return rms_one(signal.sosfilt(signal.butter(3, band, "band", fs=SR, output="sos"), x))


def low_puffs():
    """Lumpy rumble, mostly on the left port, partly shared, with a weaker flutter above it."""
    puffs = swells(PUFFS, PUFF_RISE_DB_PER_S, PUFF_FALL_DB_PER_S) + from_db(PUFF_REST_DB)
    left, right = rng.standard_normal((2, N))
    noise = np.array([left, 0.15 * left + 0.5 * right])
    rumble = band_noise(noise, [40, 79.5])
    flutter = band_noise(noise, [95, 142])
    lumps = from_db(2.3 * drift(11))
    return puffs * (rumble + from_db(-9.5) * flutter) * lumps * from_db([[4], [-4]])


def walker():
    """Dense fine grains swish, coarser ones crunch, thin stalks crackle, others knock, blades crack."""
    swish, crunch = in_time(GRASS_REST)
    swish = swish + swells(SWEEPS, SWEEP_RISE_DB_PER_S, SWEEP_FALL_DB_PER_S)
    crunch = crunch + swells(TREADS, TREAD_RISE_DB_PER_S, TREAD_FALL_DB_PER_S)
    swish_near, swish_wide = wide(lambda: grains(9000, 1.9, 3.8), SWISH, low_share=0.49, high_share=0.39)
    crunch_near, crunch_wide = wide(lambda: grains(1500, 3.0, 3.2), CRUNCH, low_share=0.4, high_share=0.12)
    crackle = rms_one(coloured(grains(300, 4.5, 4.0), SWISH))
    near = swish * (from_db(4.5) * swish_near + from_db(-8.0) * crackle)
    near = near + from_db(2.5) * crunch * crunch_near
    near = near + knocks(ahead=False) + cracks()
    spread = from_db(7.5) * swish * swish_wide + from_db(-1.0) * crunch * crunch_wide
    return at_ports(near, 2 * np.pi * HZ * FEET_LEAD_S, -2.3) + spread


def cracks():
    """A blade gives a short bright burst."""
    out, t = np.zeros(N), np.arange(400) / SR
    for s, peak_db, hz in CRACKS:
        burst = rng.standard_normal(400) * np.minimum(t / 0.00089, 1) * np.exp(-t / 0.0024)
        crack = resonance(burst, hz, 2300.0) + 0.25 * np.diff(burst, prepend=0)
        add(out, s, from_db(peak_db) * crack / np.abs(crack).max())
    return out


def knocks(ahead):
    """A tiny burst rings one pitch: a stalk under a shoe, or a duck's foot, bill or call pulse ahead."""
    out, t = np.zeros(N), np.arange(400) / SR
    for s, peak_db, hz, side in KNOCKS:
        burst = (1 + .3 * rng.standard_normal(400)) * np.exp(-t / .0001)
        body = resonance(burst, hz, 200 + .25 * hz)
        add(out, s, ((side > .5) == ahead) * from_db(peak_db) * body / np.abs(body).max())
    return out


def ducks():
    """Feet and calls ahead; the flock stands on the bank first, then swims."""
    flock = webbed_feet() + calls() + quack() + knocks(ahead=True)
    afloat = np.clip((np.arange(N) / SR - 4.6) / 0.035, 0, 1)
    pan_db = at_hz(POND_SIDE, column=2)
    on_bank = at_ports(flock * (1 - afloat), 2 * np.pi * HZ * BANK_LEAD_S, pan_db)
    return on_bank + at_ports(flock * afloat, at_hz(POND_SIDE), pan_db)


def webbed_feet():
    """Shuffling grains rustle, coloured by a narrow 1.6 kHz band, likely a microphone resonance."""
    patter = swells(PATTER, PATTER_RISE_DB_PER_S, PATTER_FALL_DB_PER_S)
    patter = patter + from_db(PATTER_REST_DB) * (np.arange(N) < 5.6 * SR)
    steps = grains(2000, 2.5, 2.0)
    narrow = resonance(resonance(steps, BAND_HZ, BAND_WIDTH_HZ), BAND_HZ, BAND_WIDTH_HZ)
    return patter * (rms_one(coloured(steps, FEET)) + from_db(BAND_DB) * rms_one(narrow))


def calls():
    """Uneven pulses, each with a puff of noise, ring a throat and a weaker bill resonance."""
    out = np.zeros(N)
    for s, length, level_db, pulse_hz, throat_hz, rough in CALLS_MADE:
        t = np.arange(round((length + .02) * SR)) / SR
        rough = np.clip(rough, 0, 1)
        chance = rng.standard_normal((64, 2))   # uneven spacing, uneven strength
        times = np.cumsum(np.r_[0, 1 + .15 * rough * chance[1:, 0]]) / pulse_hz + 0.0021
        inside = times < length
        swell = np.sin(np.pi * (.25 + .6 * times[inside] / length))
        pulses = np.zeros(len(t))
        pulses[(times[inside] * SR).astype(int)] = swell * from_db((-0.5 + 3.1 * rough) * chance[inside, 1])
        fading = signal.lfilter([1], [1, -np.exp(-pulse_hz * 3.0 / SR)], pulses)
        puffs = fading * rng.standard_normal(len(t))
        source = (1 - rough) * pulses + .3 * rough * puffs
        throat = resonance(resonance(source, throat_hz, 720), throat_hz, 710)
        bill = resonance(resonance(source, 0.74 * throat_hz, 740), 1.7 * throat_hz, 940)
        add(out, s - .002, from_db(level_db) * rms_one(throat - 0.27 * bill))
    return out


def pond():
    """Bubbles, falling spray and drops, low surges, plunges and slaps."""
    bubbly, spray, surge = in_time(CHURN)
    hiss, hiss_wide = wide(lambda: grains(4000, 3.1, 2.8), SPRAY, low_share=.12, high_share=.75)
    froth = bubbles() + from_db(-6) * gurgle()
    patter = rms_one(coloured(grains(120, 3.5, 3.0), SPRAY))
    drops = from_db(1.5) * droplets() + from_db(-10) * patter
    water = bubbly * froth + spray * (from_db(3.5) * hiss + drops) + surge * surges()
    water = water + slaps() + gulps_and_plunges()
    ahead = at_ports(water, at_hz(POND_SIDE), at_hz(POND_SIDE, column=2))
    return ahead + from_db(7.5) * spray * hiss_wide + mist()


def bubbles():
    """Bubbles of many sizes ring a few cycles; small ones are weaker."""
    born, dealt = grains(1000, 1.06, 3.44), rng.integers(0, 20, N)
    rings = np.zeros(N)
    for k, hz in enumerate(np.geomspace(400, 2400, num=20)):
        rings += resonance(born * (dealt == k) + 1e-18, hz, hz / 8.0) * (hz / 500) ** -.9
    return rms_one(rings)


def rising_tone(hz, ring_s):
    """A dying sine whose pitch climbs, as from a pocket of air near the surface."""
    t = np.arange(round(5 * ring_s * SR)) / SR
    tone = np.sin(2 * np.pi * hz * (t + 0.06 * t ** 2 / ring_s))
    return tone * np.exp(-t / ring_s) * (1 - np.exp(-t / (0.6 * ring_s)))


def gurgle():
    """Scattered bubbles that can be told apart."""
    out = np.zeros(N)
    for when, size, strength in rng.random((1000, 3)):
        hz = 430 * 4.65 ** size   # a higher draw is a smaller, higher bubble
        bubble = rising_tone(hz, (2 + 2.5 * strength ** 2) / hz)
        add(out, when * N / SR, from_db(11 * strength - 1.7 * size) * bubble)
    return rms_one(out)


def droplets():
    """Single drops fall back and ring briefly at high pitches."""
    born, dealt = grains(1400, 3.0, 2.5), rng.integers(0, 16, N)
    rings = np.zeros(N)
    for k, hz in enumerate(np.geomspace(1300, 5600, num=16)):
        ring = resonance(born * (dealt == k) + 1e-18, hz, hz / 20.0)
        rings += ring * (hz / 2000) ** -1.0 * from_db(3.5 * drift(11.6))
    return rms_one(rings)


def surges():
    """Sparse grains ring low, as moving water does."""
    return rms_one(resonance(resonance(grains(260, 2.5, 3.5), 140, 200), 140, 240))


def mist():
    """Tiny drops all over the water, other ones at each port."""
    level, = in_time(MIST)
    drops = np.array([grains(7000, 2.4, 2.0), grains(7000, 2.4, 2.0)])
    return level * rms_one(signal.sosfilt(signal.butter(3, MIST_HZ, "high", fs=SR, output="sos"), drops))


def gulps_and_plunges():
    """Gulping bubbles, and low plunging thumps at the lowest pitches, all as dying, climbing sines."""
    out = np.zeros(N)
    for s, level_db, hz, ring_s in GULPS_AND_PLUNGES:
        add(out, s, from_db(level_db) * rising_tone(hz, max(ring_s, .002)))
    return out


def slaps():
    """A slap sucks a short, mostly negative pulse, rings its air pocket, thumps and throws a burst of spray."""
    out, t = np.zeros(N), np.arange(2600) / SR
    far = signal.butter(2, 150, "high", fs=SR, output="sos")   # the quick pulse radiates little bass
    push = .6 * (t < .001) * (t / .001) ** 2
    before, after = np.maximum(.0013 - t, 0), np.maximum(t - .0013, 0)
    pulse = push - 1.7 * np.exp(-(before / .0001) ** 2 - after / .00022)
    thump = resonance(resonance(pulse, 87, 234), 89, 280)
    for s, level_db, thump_db, spray_db, length in SLAPS:
        noise = rng.standard_normal(2600)
        burst = noise * np.exp(-(t / max(length, .001)) ** 2)
        trapped = from_db(POCKET_DB - POCKET_LOSS_PER_SPRAY_DB * (spray_db + 40))
        pocket_hz = 530 * 2 ** (.15 * noise[0])
        pocket = resonance(np.roll(pulse, round(POCKET_DELAY_S * SR)), pocket_hz, 240) * trapped
        pocket = pocket + resonance(burst * (t > .0018), 1600, 1500) * 0.9
        # the water falls back
        wash = resonance(noise[::-1] * (t / WASH_S) * np.exp(-t / WASH_S), 660, 2200) * from_db(WASH_DB)
        spray = (t > .0014) * (resonance(burst, 2100, 2100) + 0.21 * resonance(burst, 12600, 4700))
        slap = signal.sosfilt(far, pulse + pocket + wash)
        slap = slap + thump * from_db(thump_db + 15.5) + spray * from_db(spray_db + 12.0)
        add(out, s - .0013, from_db(level_db) * slap)
    return out


def quack():
    """Nearly steady pulses ring a fixed throat and a bill whose resonance slides."""
    s, level_db, bill_hz = np.transpose(QUACK)
    pulse_s, rates_hz, weak_levels = np.transpose(QUACK_PULSES)
    t = np.arange(pulse_s[0], s[-1], 1 / SR)
    pulse_hz = np.interp(t, pulse_s, rates_hz) * (1 + QUACK_JITTER * drift(90)[:len(t)])
    weak_db = np.interp(t, pulse_s, weak_levels)
    cycles = np.cumsum(pulse_hz) / SR
    count = cycles.astype(int)
    since = (cycles % 1) / pulse_hz   # time since the last pulse
    strength = from_db(1.3 * rng.standard_normal(64))[count]
    strength = strength * from_db(weak_db * (count % 4 > 0))
    bill = np.sin(2 * np.pi * np.interp(t, s, bill_hz) * since)
    bill = strength * bill * since * np.exp(-since / BILL_RING_S)
    pulses = strength * (np.diff(count, prepend=0) > 0)
    throat = resonance(resonance(pulses, THROAT_HZ, 1 / (np.pi * THROAT_RING_S)), THROAT_HZ, 630)
    voice = rms_one(bill) + from_db(THROAT_DB) * rms_one(throat)
    fade_in = np.minimum(1, (t - t[0]) / 0.0082)
    out = np.zeros(N)
    add(out, t[0], voice * from_db(np.interp(t, s, level_db)) * fade_in)
    return out


def scene():
    """All sources over the quiet open air."""
    return open_air() + low_puffs() + walker() + ducks() + pond()


def record(dry):
    """A steep low-pass filter cuts the top."""
    return signal.sosfilt(signal.ellip(12, .5, 75, CUTOFF_HZ, fs=SR, output="sos"), dry)


dry = scene()
out = record(dry)
unload_audio(out)
```